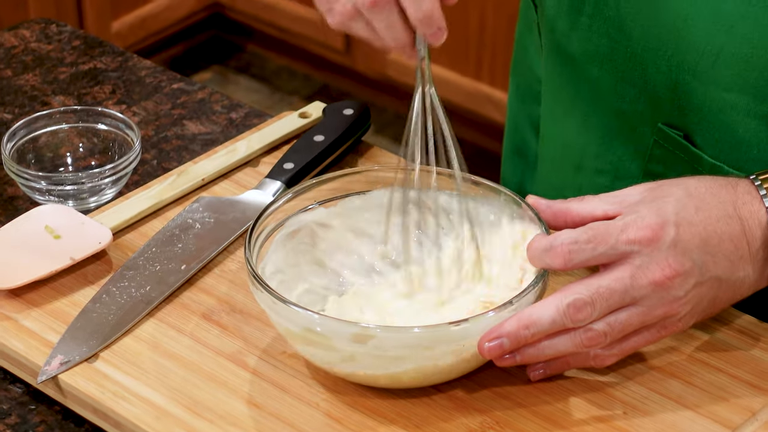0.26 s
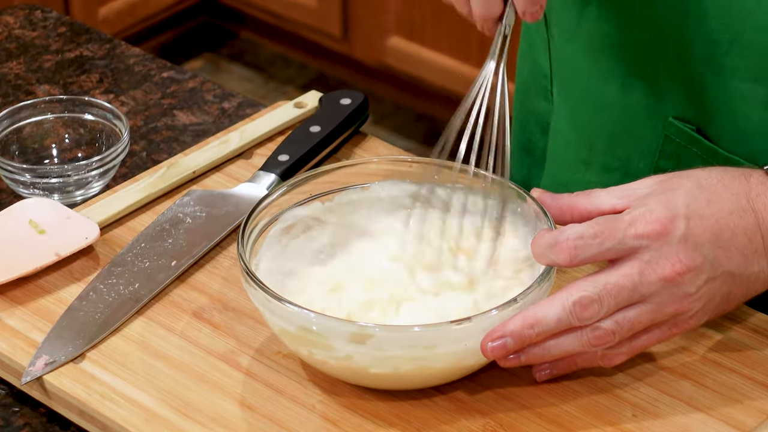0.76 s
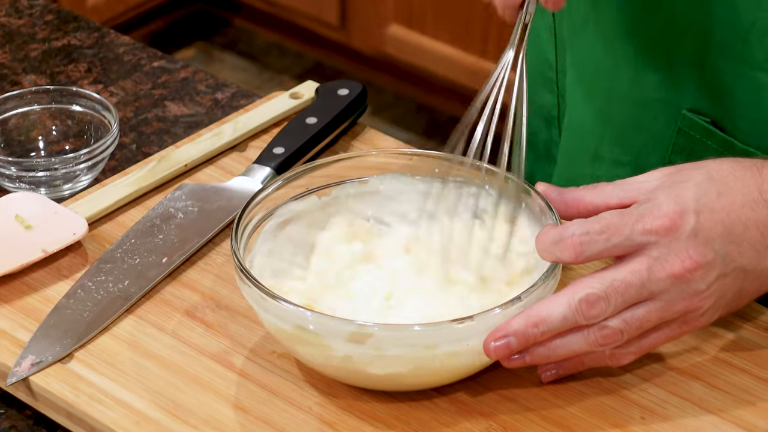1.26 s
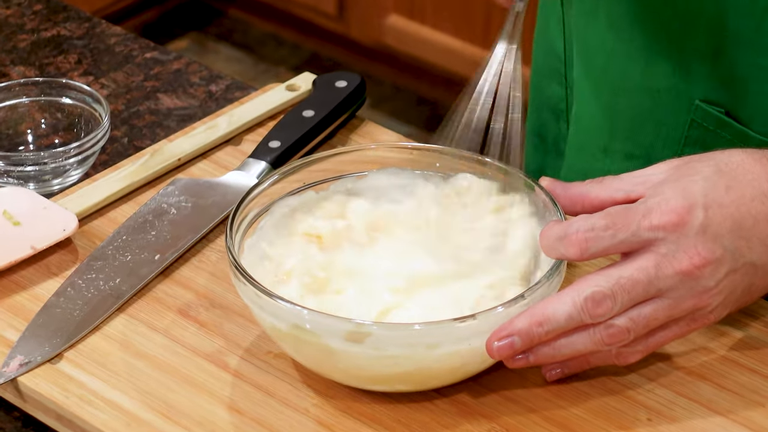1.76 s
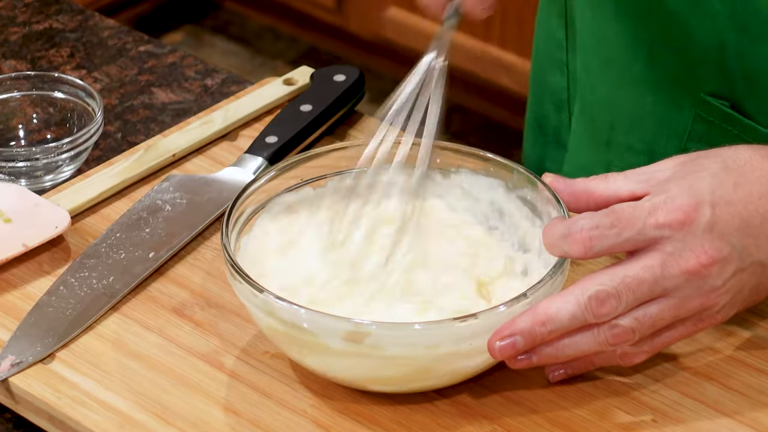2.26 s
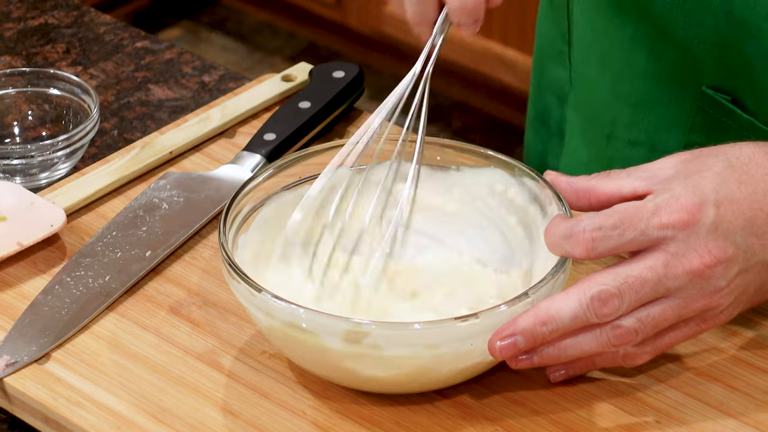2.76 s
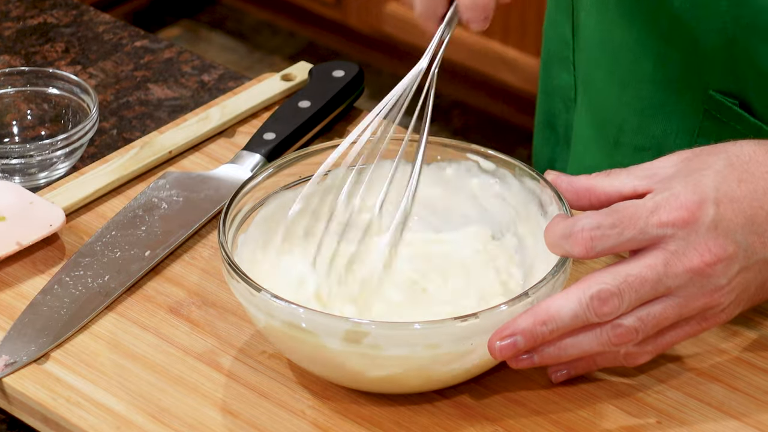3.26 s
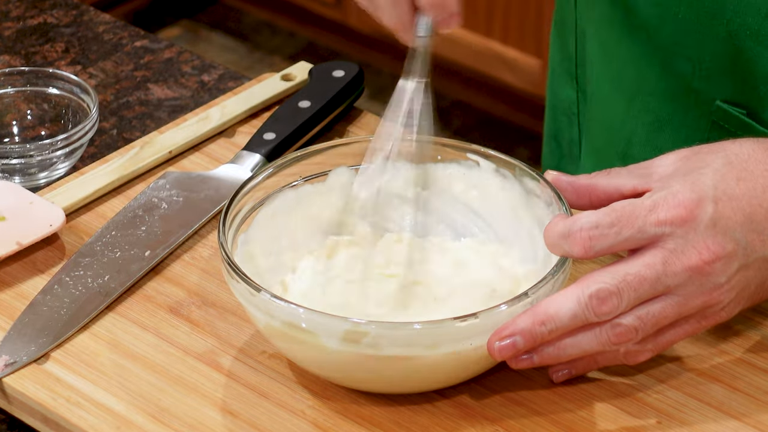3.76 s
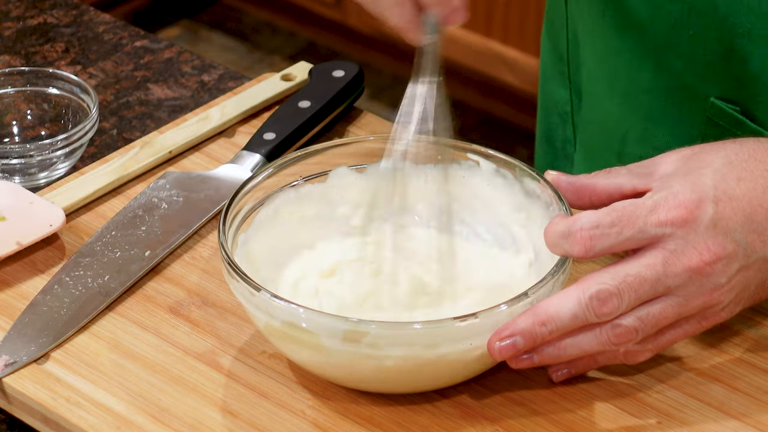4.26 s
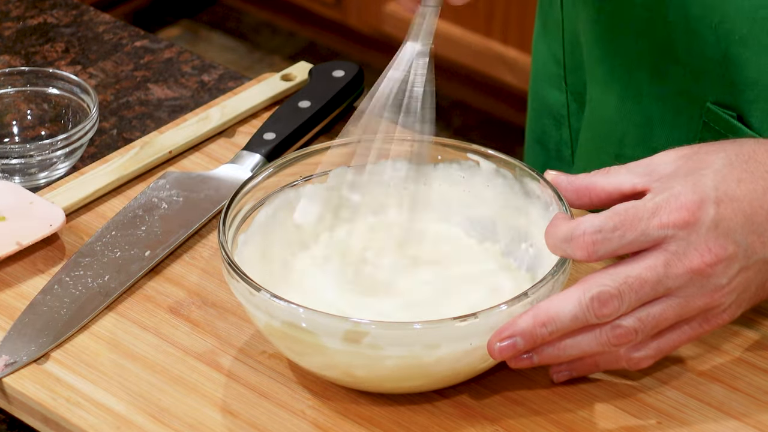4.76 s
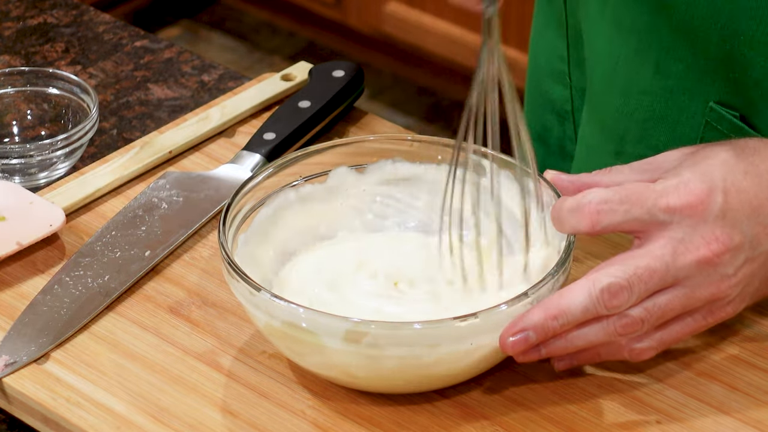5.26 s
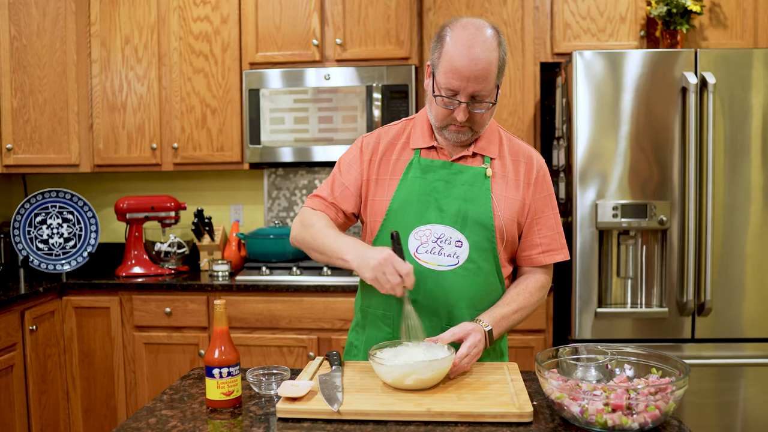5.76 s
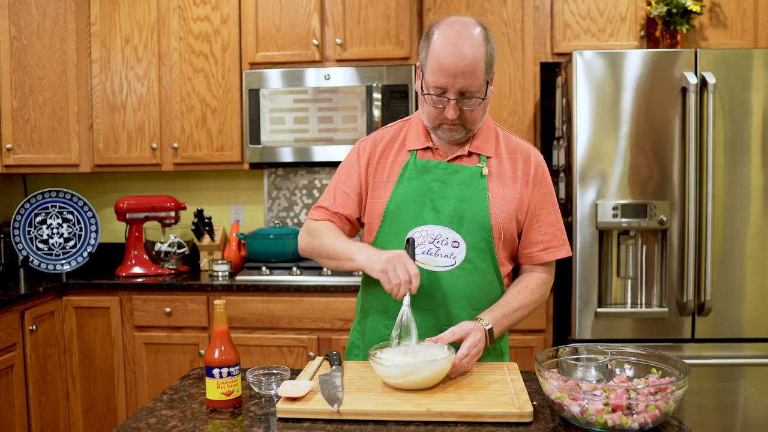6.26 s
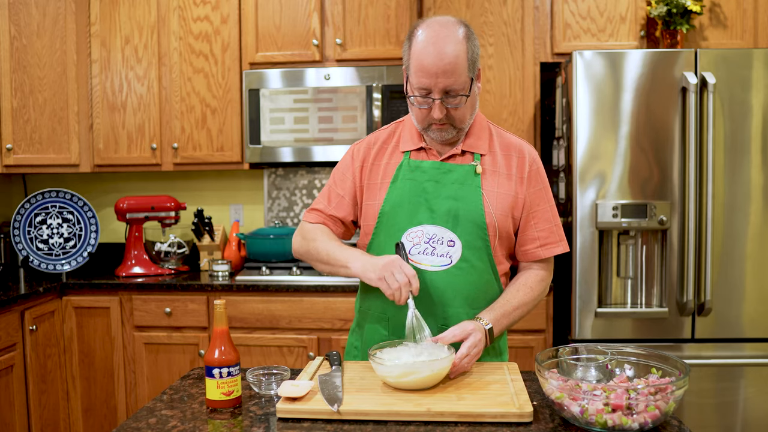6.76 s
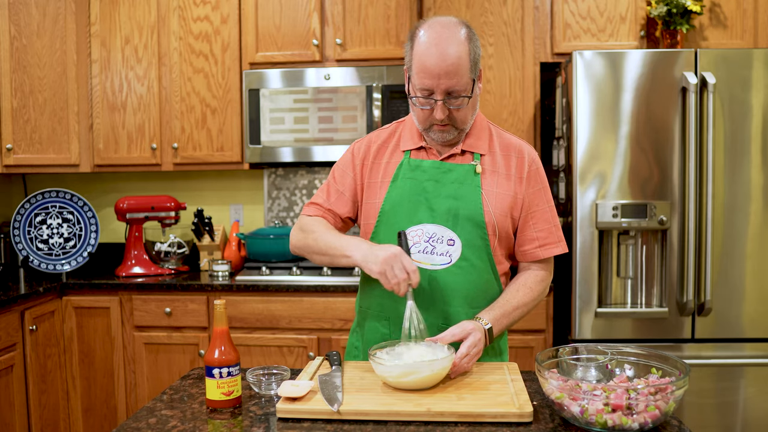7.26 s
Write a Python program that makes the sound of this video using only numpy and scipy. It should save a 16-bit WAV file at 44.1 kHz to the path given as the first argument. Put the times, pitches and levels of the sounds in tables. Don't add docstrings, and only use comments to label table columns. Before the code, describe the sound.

A wire whisk beats thick sauce in a glass bowl on a wooden board, heard from about a metre in a small, quiet kitchen with very short reflections. It hovers almost silently until 0.13 s, then a soft clink and light taps lead into faint scraping. Sparse gentle blows come around 1.1 and 1.3 s; from 1.8 s they quicken, alternating between near and far walls, each a short damped glass clank with a hollow hum and wiry chatter. From 3.5 to 4.4 s they crowd together, brighter and raspier, with a hard ringing hit at 4.5 s. Around 5.2 to 5.7 s it eases to ticks, scrapes and small singing tones. Firm strokes resume at 5.8 s, with a heavy low thud at 6.05 s. The loudest, sizzling blows fall from 6.86 to 7.3 s, with another thud near 7.06 s; beating continues to the end at about 7.5 s.

```python
import sys
import numpy as np
from scipy import signal
from scipy.fft import rfft, irfft
from scipy.io import wavfile
from scipy.ndimage import uniform_filter1d

SR = 44100
rng = np.random.default_rng(int(sys.argv[2]) if len(sys.argv) > 2 else 0)


def to_wav(sig):
    pcm = np.clip(np.atleast_2d(sig), -1, 1) * 32767
    pcm = np.round(pcm).astype(np.int16)
    wavfile.write(sys.argv[1], SR, pcm.T)


def nominal_scale(level):
    x = np.asarray(level, float) / 20
    return 10 ** x


N = 332073


def band(x, lo_hz, hi_hz):
    return signal.sosfilt(signal.butter(2, [lo_hz, min(hi_hz, .45 * SR)], "band", fs=SR, output="sos"), x)


def mode(x, hz, t60):
    r = np.exp(-np.log(1000) / (max(t60, .002) * SR))
    w = 2 * np.pi * hz / SR
    return signal.lfilter([np.sin(w)], [1, -2 * r * np.cos(w), r * r], x)


def unit(x):
    return x / np.sqrt(np.mean(x ** 2))


def walk(rate):
    k = int(SR / rate)
    held = np.repeat(rng.standard_normal(N // k + 1), k)
    return unit(uniform_filter1d(uniform_filter1d(held, k), k)[:N])


def steady(x, span_s):
    return x / np.sqrt(uniform_filter1d(x ** 2, int(span_s * SR)) + 1e-9)


def train(s, gain):
    return np.bincount(np.clip((s * SR).astype(int), 0, N - 1).ravel(), gain.ravel(), N)


def even_power(db):
    return db - 10 * np.log10(np.mean(nominal_scale(2 * db), axis=1, keepdims=True))


# pitch in Hz, level in dB, t60 in seconds.
HUM = [(646.4, 3, 0.049), (665.3, 2.5, 0.066), (695.6, -0.5, 0.055), (753, 4.5, 0.078), (785, -6, 0.17)]
# pitch in Hz, level in dB, t60 in seconds.
CLANK = [(404.7, -2.5, 0.079), (524, -11, 0.046), (1053, 1, 0.076), (1245, -4.5, 0.071), (1384, 5.5, 0.093),
         (1603, 9.5, 0.041), (1690, -9, 0.19), (1873, 5.5, 0.019), (1990, 2.5, 0.022), (2176, 14.5, 0.019),
         (2294, 3, 0.027)]
# pitch in Hz, level in dB, t60 in seconds.
GLASS = [(2686, -3, 0.026), (3164, -8, 0.06), (3390, -4, 0.012), (4400, 3, 0.014), (4710, -14.5, 0.037),
         (5273, -10.5, 0.026), (5760, -7.5, 0.022), (6790, 2, 0.01), (7335, 0.5, 0.02), (7990, 7, 0.0064)]
# pitch in Hz, level in dB, t60 in seconds.
WIRE = [(8740, 16.5, 0.0055), (9790, 13.5, 0.0037), (10680, 21.5, 0.0026), (11300, 0, 0.0053)]


def blows(first=0.79, uneven_db=1.0, scatter_db=7.0, glass_db=-5):
    s, clank_db, hum_db, hum_hz, wire_db, clank_hz = all_blows().T
    chatter_s = np.clip(0.028 * nominal_scale(0.27 * (clank_db + 28.5)), .008, .2)
    t = np.arange(int(.06 * SR)) / SR
    fall = np.exp(-np.log(1000) * t / chatter_s[:, None]) * (1 - np.exp(-t / 0.0013))
    bunches = np.repeat(rng.standard_normal((len(s), 100)), 45, axis=1)[:, :len(t)]
    fall *= nominal_scale(3.27 * bunches)
    chatter = rng.standard_normal(fall.shape) * nominal_scale(uneven_db * rng.exponential(size=fall.shape)) * fall
    chatter /= np.sqrt(np.sum(chatter ** 2, axis=1, keepdims=True))
    push = chatter.copy()
    push[:, 20] += first
    when = s[:, None] + t

    def ring(modes, db, lean, push=push, scatter_db=scatter_db):
        spot = even_power(scatter_db * rng.standard_normal((len(s), len(modes))))
        out = 0
        for k, (hz, mode_db, t60) in enumerate(modes):
            gain = nominal_scale(db + mode_db + spot[:, k] + lean(hz))
            out = out + mode(train(when, push * gain[:, None]), hz, t60)
        return out

    def crack(db, lo_hz, hi_hz):
        edges = np.geomspace(lo_hz, hi_hz, num=4)
        clump = even_power(6 * rng.standard_normal((len(s), 3)))
        return sum(band(train(when, chatter * nominal_scale(db + clump[:, k])[:, None]), edges[k], edges[k + 1])
                   for k in range(3))

    def even(hz):
        return 0

    def near_hum(hz):
        return -.2 * np.abs(hz - hum_hz)

    def near_clank(hz):
        if hz < 600:
            return 0.22 * (clank_db + 17.5) + 1.0
        return 3.5 - 15 * np.abs(np.log2(hz / clank_hz))

    landing = .5 * chatter + (push - chatter) * 1.2
    hum = ring(HUM, hum_db - 8.0, near_hum, landing, scatter_db=3.5)
    hum = band(band(band(hum, 510, 1450), 520, 1300), 520, 1300)
    glass = ring(GLASS, clank_db + glass_db - 13.5, even) + crack(clank_db + glass_db + 23.0, 3140, 6440)
    clank = ring(CLANK, clank_db - 21.5, near_clank) + crack(clank_db + 19.5, 1420, 3520)
    wire = ring(WIRE, wire_db - 17.5, even) + crack(wire_db + 21, 9670, 9970)
    wire = wire + crack(wire_db + 5, 10700, 13600)
    return hum + glass + clank + wire


# start in seconds, clank peak in dB, bowl hum in dB,
# wire sizzle in dB, clank pitch in Hz.
NEAR = [(0.1378, -22.5, -28.5, -43, 1960), (1.0528, -28, -32, -41, 1730), (1.1169, -30, -31, -44, 1580),
        (1.832, -23.5, -19.5, -40, 2100), (1.8927, -29, -24, -49, 1410), (2.0991, -28.5, -26, -36.5, 2220),
        (2.183, -23.5, -20.5, -47, 1400), (2.4269, -19, -18.5, -35, 1860), (2.6799, -29.5, -27, -46, 1920),
        (2.7267, -26, -24, -44, 1490), (2.7686, -39, -18, -44, 1380), (2.9098, -28, -24.5, -32.5, 1850),
        (2.9307, -27, -27, -30, 1640), (2.9816, -25, -23, -38, 2230), (3.249, -20, -19.5, -37, 1600),
        (4.1645, -22.5, -25, -32, 1510), (4.2921, -24, -28, -49, 1550), (4.4995, -8.5, -5.5, -22, 2200),
        (4.737, -17.5, -14, -28, 1950), (4.7825, -31, -28, -47, 1910), (4.8709, -24, -24, -35, 1600),
        (5.772, -15.5, -13.5, -36, 1150), (5.8255, -12.5, -22, -31, 1680),
        (6.1877, -19.5, -19.5, -42, 1400), (6.2462, -16, -18, -24, 1360), (6.622, -17.5, -16.5, -34, 2020),
        (6.6706, -18.5, -16, -30, 1420), (6.8585, -8, -6, -21, 1910), (7.0653, -11.5, -10.5, -28, 1960),
        (7.201, -7.5, -13, -16.5, 2250)]
# start in seconds, clank peak in dB, bowl hum in dB,
# wire sizzle in dB, clank pitch in Hz.
FAR = [(.3616, -36, -54, -53, 2200), (1.3059, -37, -30.5, -59, 1600), (1.9884, -28, -32, -38.5, 2200),
       (2.249, -14.5, -15, -27.5, 2280), (2.5561, -25, -36, -46, 1580), (2.8, -16, -16, -32, 1010),
       (3.185, -28, -27.5, -48, 1720), (3.477, -32.5, -28, -40, 2090), (3.5256, -18, -28, -33, 1610),
       (3.5525, -17, -19.5, -20, 2270), (3.5985, -26.5, -27, -35, 2150), (3.8055, -15.5, -26, -36, 1360),
       (3.8304, -13, -17, -24, 1390), (3.889, -21, -29, -23, 1560), (3.9599, -28.5, -25.5, -33, 1240),
       (4.063, -19.5, -31, -32, 1200), (4.1011, -17.5, -21.5, -28, 1400), (4.3289, -19, -27, -36, 1370),
       (4.4079, -19.5, -37, -33, 1380), (4.922, -25, -20.5, -35, 1880), (5.004, -24, -28.5, -36, 2140),
       (5.1256, -15, -18, -23.5, 1570), (5.4335, -24.5, -21.5, -27.5, 2070),
       (5.885, -29.5, -26.5, -49, 1650), (5.9585, -14, -17, -40, 2140), (6.4248, -28, -22.5, -40, 1500),
       (6.926, -20, -27, -45, 2310), (7.1125, -23.5, -21, -32, 1900), (7.2814, -13, -14.5, -34, 2130),
       (7.4995, -13, -17, -28, 1340)]
# start in seconds, wire sizzle in dB, clank in dB,
# clank pitch in Hz.
STRAGGLERS = [(1.1483, -31, -37, 2280), (2.3191, -40, -36, 1600), (2.574, -33, -31, 1360),
              (2.826, -29, -39, 2200), (3.1961, -37, -38, 1580), (3.2839, -33, -32, 2120),
              (3.3638, -31, -36, 1650), (3.5324, -31, -35, 1200), (3.5428, -17.5, -24, 2270),
              (3.6267, -34, -39.5, 1480), (3.7279, -43, -39.5, 1350), (3.8144, -31, -28, 1360),
              (3.8212, -30, -25.5, 1510), (3.8444, -21.5, -28, 1350), (3.915, -32, -31.5, 1570),
              (3.9983, -35, -46, 1350), (4.0345, -38, -37, 1980), (4.0727, -37, -27, 1550),
              (4.0874, -39, -33, 1370), (4.5044, -10, -27, 1220), (4.5114, -17, -34, 1860),
              (4.5999, -37, -30.5, 1550), (5.1374, -33, -40, 1660), (5.1462, -16, -33.5, 1610),
              (5.1574, -16, -30, 1970), (5.405, -48, -43, 2150), (5.5139, -41, -51, 2260),
              (5.5874, -43, -51, 1900), (5.7009, -49, -50, 1960), (5.9544, -24, -32, 2160),
              (6.0638, -34, -30.5, 1930), (6.0796, -28, -33, 1350), (6.2811, -23.5, -42, 1450),
              (6.3859, -37, -36.5, 1880), (6.4772, -37, -34, 1490), (6.7057, -40, -38, 1490),
              (6.7341, -39, -35.5, 2240), (6.8633, -13, -38, 2160), (6.8724, -10.5, -31, 1630),
              (7.0734, -14.5, -32, 1310), (7.2732, -15.5, -29, 1780), (7.4036, -37, -36.5, 2120),
              (7.4934, -33, -29.5, 2030), (7.4993, -21, -50, 2220), (7.5174, -40, -40, 2170)]
# start in seconds, clank peak in dB, wire sizzle in dB.
TAPS = [(.166, -25, -56), (.4507, -26, -38.5), (1.3468, -33, -47), (1.3962, -36.5, -58), (1.5524, -32, -41),
        (1.6656, -44, -55), (1.942, -30.5, -40), (2.2343, -30, -43), (2.3007, -24, -33.5),
        (2.5107, -35.5, -43), (3.0435, -25.5, -44), (3.2296, -31, -43), (3.3458, -29.5, -42),
        (3.4935, -28, -51), (3.7589, -31, -44), (3.7793, -30.5, -54), (4.0238, -32, -45),
        (4.3485, -19, -30.5), (4.5446, -17.5, -25.5), (4.8045, -24, -49), (5.242, -29, -56),
        (5.2954, -32, -47), (5.3378, -30, -48), (6.0467, -23.5, -41), (6.2335, -21, -31),
        (6.4857, -26, -45), (6.5448, -33, -51), (6.776, -33, -59), (7.3921, -33.5, -53),
        (7.424, -26.5, -47)]
# start in seconds, clank peak in dB.
TICKS = [(0.1327, -55), (0.3423, -34.5), (1.0405, -36), (2.9557, -33), (4.0473, -30), (4.132, -32),
         (4.2831, -27), (4.579, -32), (4.642, -34), (5.221, -31), (5.42, -32), (5.4735, -46),
         (5.521, -36.5), (5.5776, -36.5), (5.709, -42), (6.0254, -28), (6.4532, -27), (7.1477, -24.5)]
# start in seconds,
# peak in dB, hum pitch in Hz.
NUDGES = [(0.359, -42, 802), (0.552, -38, 670), (0.615, -37.5, 703), (0.664, -48, 727), (0.877, -50, 680),
          (1.183, -47, 647), (1.407, -58, 690), (1.609, -34.5, 665), (1.677, -58, 690), (2.464, -26.5, 635),
          (3.019, -30, 670), (4.351, -32, 800), (4.529, -16.5, 650), (5.297, -39.5, 662), (5.437, -25, 840),
          (6.133, -29.5, 738), (6.39, -33, 770), (6.456, -29, 684), (6.889, -28, 790), (7.309, -32, 625),
          (7.408, -37, 680)]
NEAR_HZ, FAR_HZ, TAP_HZ = 677.4, 760, 690
PLAIN_HZ = 1850


def all_blows():
    rows = [(s, db, hum, NEAR_HZ, wire, hz) for s, db, hum, wire, hz in NEAR]
    rows += [(s, db, hum, FAR_HZ, wire, hz) for s, db, hum, wire, hz in FAR]
    rows += [(s, db + 5.5, db - 0.5, TAP_HZ, wire - 6, hz) for s, wire, db, hz in STRAGGLERS]
    rows += [(s, db, db - 6.5, TAP_HZ, wire, PLAIN_HZ) for s, db, wire in TAPS]
    rows += [(s, db, db - 8.5, TAP_HZ, db - 18, PLAIN_HZ) for s, db in TICKS]
    rows += [(s, db - 12, db + 3, hz, db - 30, PLAIN_HZ) for s, db, hz in NUDGES]
    return np.array(sorted(rows))


def scrape(slips_per_s=3000, damp=0.47, glass_damp=0.7, body_db=-23):
    glass_db, hum_db, clank_db, wire_db = contact()
    body = 2.26 * (clank_db + 46.0) - 45.0 + body_db
    slips = (rng.random(N) < slips_per_s / SR) * nominal_scale(1.5 * rng.exponential(size=N)) * rng.standard_normal(N)
    slips = (unit(slips) + 1.14 * rng.standard_normal(N)) * nominal_scale(1.4 * walk(160))
    pitched = np.array([b for b in all_blows() if b[3] != TAP_HZ])
    hum_hz = np.interp(np.arange(N) / SR, pitched[:, 0], pitched[:, 3])
    layers = [(GLASS, glass_db, 2400, 7560, .45, glass_damp, 0),
              (HUM, hum_db, 614, 842, .03, 1, .22),
              (CLANK[2:], clank_db, 906, 3320, .15, damp, 0),
              (WIRE, wire_db, 6350, 12660, .8, damp, 0),
              (CLANK[:2], body, 337, 650, .4, damp, 0)]
    out = 0
    for modes, db, lo_hz, hi_hz, bare, ring_left, pull in layers:
        rung = 0
        for hz, mode_db, t60 in modes:
            roam = 6.5 * walk(17) - pull * np.abs(hz - hum_hz)
            rung = rung + mode(slips * nominal_scale(mode_db + roam), hz, t60 * ring_left)
        heard = unit(rung) + bare * unit(band(slips, lo_hz, hi_hz))
        heard = band(band(heard, lo_hz, hi_hz), lo_hz, hi_hz)
        out = out + steady(band(heard, 0.91 * lo_hz, 1.3 * hi_hz), .1) * nominal_scale(db)
    return out


def contact():
    _, glass_db, clank_db, _ = all_sweeps()
    glass = sweeps(glass_db, 1.0, rest_db=-6.5)
    hum = sweeps(clank_db - 3.5, 2.1, rest_db=-1) + 4.03 * walk(20)
    clank = sweeps(clank_db, 0.78, rest_db=-1.5)
    wire = sweeps(2.0 * (glass_db + 47.5) - 61, 1.3, rest_db=-16.0)
    return glass, hum, clank, wire


# time in seconds, level in dB.
LEAN = [(0.0, -45.5), (0.36, -57.5), (1.32, -52), (1.91, -51.5), (2.37, -50.5), (2.54, -46.5),
        (2.89, -46.5), (3.04, -50), (3.82, -52), (3.96, -45.5), (4.32, -51), (4.76, -45.5), (5.26, -54.5),
        (6.02, -51.5), (6.71, -47.5), (6.82, -47.5), (7.3, -44.5), (7.53, -50.5)]


def sweeps(peak_db, steep, rest_db, rise_s=0.046, hold_s=0.014, depth_db=26):
    t = np.arange(0, N / SR + .004, .002)
    s, length = all_sweeps()[[0, 3], :, None]
    rise = (s - t) / rise_s
    sink = np.maximum(t - s - hold_s, 0) / np.maximum(length, .02)
    shape = -steep * depth_db * np.where(t < s, rise, sink)
    rest = np.interp(t, *np.transpose(LEAN)) + rest_db
    power = np.sum(nominal_scale(2 * (peak_db[:, None] + shape)), axis=0) + nominal_scale(2 * rest)
    hover_db = -19 * (t < .13)
    return np.interp(np.arange(N) / SR, t, 10 * np.log10(power) + hover_db)


# peak time in seconds, glass in dB, clank in dB, length in seconds.
SWEEPS = [(0.17, -78, -44.5, 0.16), (0.37, -44, -41.5, 0.27), (0.633, -46.5, -43, 0.28),
          (0.879, -45, -44, 0.43), (1.151, -44, -43, 0.23), (1.392, -45, -45, 0.36),
          (1.678, -44, -44.5, 0.28), (1.95, -45.5, -44, 0.36), (2.24, -47.5, -42, 0.33),
          (2.416, -46, -44, 0.046), (2.523, -44, -45.5, 0.18), (2.78, -42.5, -44, 0.39),
          (3.037, -42.5, -41, 0.2), (3.268, -42, -42.5, 0.31), (3.546, -46.5, -43.5, 0.36),
          (3.838, -42, -38, 0.2), (4.078, -43.5, -40, 0.42), (4.338, -45.5, -41, 0.48),
          (4.558, -45, -43.5, 0.39), (4.812, -40.5, -43, 0.13), (5.055, -49, -58, 0.1),
          (5.148, -38.5, -36.5, 0.086), (5.436, -43.5, -65, 0.18), (5.945, -50, -38, 0.35),
          (6.227, -43.5, -38, 0.27), (6.484, -40.5, -47, 0.2), (6.722, -39.5, -41.5, 0.069),
          (6.895, -47, -43, 0.27), (7.22, -39.5, -46, 0.16), (7.529, -38, -59, .2)]
# peak time in seconds, glass in dB,
# length in seconds.
FLICKS = [(1.057, -59, 0.072), (1.49, -50, 0.16), (2.1, -56, 0.058), (4.595, -41, 0.063),
          (5.848, -46, 0.16), (6.09, -45, 0.27), (6.36, -46.5, 0.033), (6.823, -41.5, 0.16),
          (6.948, -36, 0.075), (7.038, -42.5, .06), (7.165, -39.5, 0.1), (7.395, -49.5, 0.11)]


def all_sweeps():
    return np.array(SWEEPS + [(s, db, db - 4, length) for s, db, length in FLICKS]).T


# start in seconds, length in seconds,
# level in dB, pitch in Hz.
SONGS = [(0, 0.075, -62, 806), (6.858, 0.023, -21.5, 690), (6.885, 0.11, -39, 702), (.86, .12, -57, 4400),
         (1.143, 0.11, -52, 5470), (1.38, 0.11, -52, 5770), (1.391, 0.13, -53, 4380),
         (1.428, 0.078, -59, 6600), (1.661, 0.073, -49, 4320), (1.658, 0.091, -53, 5700),
         (.35, .09, -55, 2170), (0.669, 0.085, -59, 2190), (0.064, 0.042, -65, 1940),
         (5.039, 0.058, -52, 5770), (5.042, 0.071, -43, 1396), (5.045, 0.086, -46.5, 2276),
         (5.424, 0.049, -40, 800), (5.469, 0.043, -45.5, 768), (5.438, 0.064, -50, 1980),
         (5.414, 0.06, -45, 5200), (5.514, 0.051, -44.5, 770), (5.58, .05, -55.5, 750),
         (5.616, 0.073, -45, 764), (5.654, 0.062, -51, 1976), (6.919, 0.13, -45.5, 1604),
         (7.138, 0.068, -54, 4570), (7.139, .06, -43.5, 5700), (7.196, 0.06, -38.5, 5470),
         (7.208, 0.078, -39.5, 1975), (7.29, .08, -46, 745), (7.377, 0.066, -43.5, 749),
         (7.491, 0.043, -35.5, 738), (4.572, 0.039, -42.5, 5570), (4.595, 0.031, -42, 6540),
         (4.47, 0.05, -46, 4400)]


def songs():
    out = np.zeros(N)
    t = np.arange(int(.4 * SR)) / SR
    for s, length, db, hz in SONGS:
        rub = rng.standard_normal(len(t)) * np.sin(np.pi * np.minimum(t / length, 1) ** .5)
        note = mode(rub, hz, .07 * 2000 / (hz + 1300))
        note = note / np.sqrt(np.sum(note ** 2) / (length * SR))
        i = int(s * SR)
        out[i:i + len(t)] += (nominal_scale(db) * note)[:N - i]
    return out


# start in seconds, peak in dB, pitch in Hz, t60 in seconds.
THUDS = [(0, -55, 113, 0.17), (.73, -61, 75.5, 0.51), (1.478, -60, 75, .4), (1.69, -64, 70, .2),
         (2.869, -43, 75, 0.33), (3.789, -43, 110, 0.18), (3.97, -43, 74.5, 0.27), (4.3, -61, 74, 0.18),
         (4.62, -52, 140, .25), (5.31, -68, 170, .1), (5.9, -56, 149, .2), (0.197, -51, 72, 0.5),
         (.578, -46, 156, 0.094), (1.901, -62, 73.5, 0.4), (2.214, -55, 75, 0.55), (2.476, -49, 127, 0.19),
         (2.773, -40, 96, 0.28), (2.8, -27, 163, 0.069), (2.791, -44, 302, 0.22), (6.239, -33, 290, 0.27),
         (3.31, -56, 97, 0.17), (3.61, -58, 108, 0.071), (3.05, -51, 85.5, 0.23), (3.874, -31.5, 94, 0.16),
         (4.092, -51, 67, 0.48), (4.399, -52, 76, 0.18), (4.54, -43, 99, 0.34), (5.661, -57, 170, 0.18),
         (6.045, -18, 96.7, 0.14), (6.189, -37, 101.3, 1), (6.305, -35, 132, 0.17), (6.45, -42, 84, 0.18),
         (6.701, -55, 139.3, 0.29), (7.249, -41, 79.5, 0.18), (7.059, -18.5, 94, 0.065)]


def thuds(push_s=0.0038, shake_db=-8, rumble_db=-24, rumble_s=0.097):
    out = np.zeros(N)
    t = np.arange(int(.6 * SR)) / SR
    for s, db, hz, t60 in THUDS:
        fall = np.exp(-np.log(1000) * t / t60) * (1 - np.exp(-t / push_s)) ** 2
        body = np.sin(2 * np.pi * 0.94 * hz * t) + 1.7 * np.sin(2 * np.pi * 1.85 * hz * t) * fall
        shake = nominal_scale(shake_db) * unit(band(rng.standard_normal(len(t)), 0.72 * hz, 1.48 * hz))
        rumble = nominal_scale(rumble_db) * unit(band(rng.standard_normal(len(t)), 0.43 * hz, 1.55 * hz))
        rumble = rumble * np.exp(-t / rumble_s) * (1 - np.exp(-t / 0.0028))
        firm = np.clip((db + 40) / 26, .15, 1)
        thud = nominal_scale(db) * ((firm * body + shake) * fall + rumble)
        i = int(s * SR)
        out[i:i + len(t)] += thud[:N - i]
    return band(band(out, 45, 500), 58, 400)


def kitchen(x, wet_db=-12, t60=0.21, first_s=0.0031):
    t = np.arange(int(.5 * SR)) / SR
    echo = band(rng.standard_normal(len(t)), 144, 15500) * np.exp(-np.log(1000) * t / t60) * (t > first_s)
    return x + nominal_scale(wet_db) * signal.fftconvolve(x, echo / np.sqrt(np.sum(echo ** 2)))[:N]


# frequency in Hz, level in dB per Hz.
AIR = [(30, -2.5), (80, 1), (190, -22), (250, 4.5), (310, -43), (500, -48), (2000, -22), (13000, -29)]


def air(level_db=-84.5):
    hz = np.maximum(np.fft.rfftfreq(N, 1 / SR), 1)
    curve_hz, curve_db = np.array(AIR).T
    shape = nominal_scale(np.interp(np.log(hz), np.log(curve_hz), curve_db))
    hush = irfft(rfft(rng.standard_normal(N)) * shape, N)
    return unit(hush) * nominal_scale(level_db + 5.2 * walk(4.5))


def scene():
    bowl = kitchen(blows() + songs()) + scrape()
    bowl = signal.sosfilt(signal.butter(4, 476, "high", fs=SR, output="sos"), bowl)
    return (bowl + thuds() + air())[None]


def top_cut(x):
    return signal.sosfilt(signal.butter(12, 16670, fs=SR, output="sos"), x)


def record(dry):
    rounded = np.tanh(1.176 * dry) / 1.406
    mix = signal.sosfilt(signal.ellip(8, .2, 70, 15750, fs=SR, output="sos"), rounded)
    return top_cut(mix)


dry = scene()
out = record(dry)
to_wav(out)
```